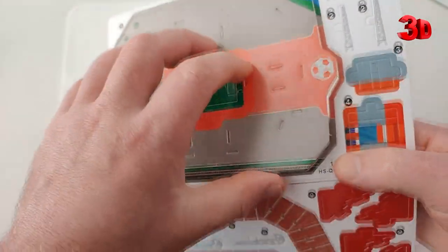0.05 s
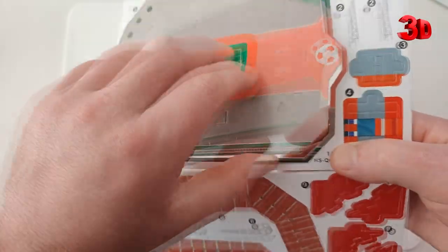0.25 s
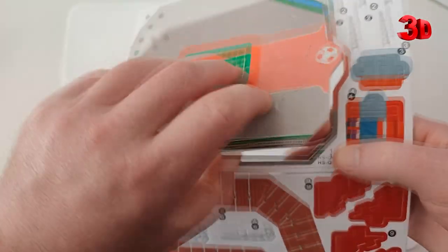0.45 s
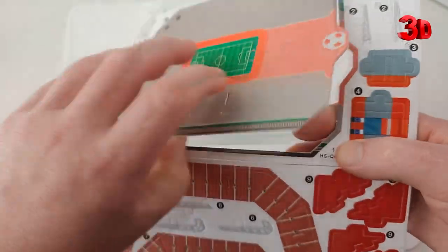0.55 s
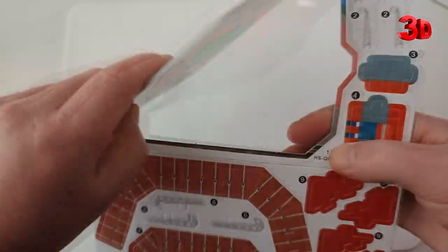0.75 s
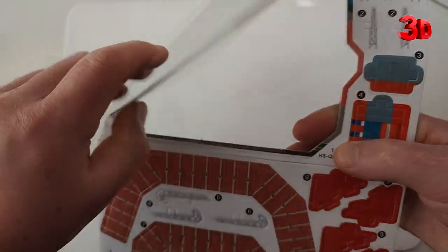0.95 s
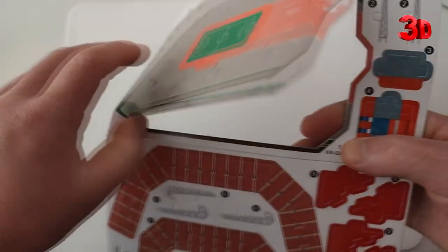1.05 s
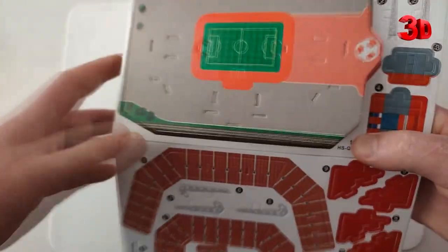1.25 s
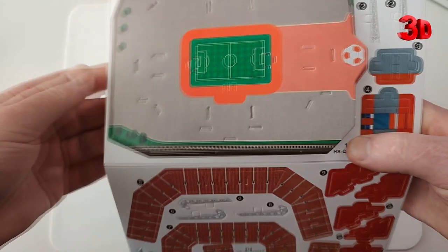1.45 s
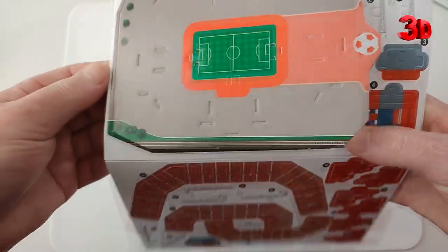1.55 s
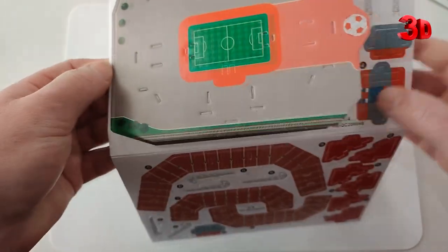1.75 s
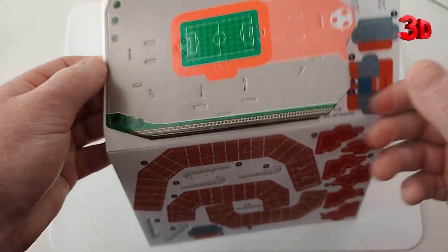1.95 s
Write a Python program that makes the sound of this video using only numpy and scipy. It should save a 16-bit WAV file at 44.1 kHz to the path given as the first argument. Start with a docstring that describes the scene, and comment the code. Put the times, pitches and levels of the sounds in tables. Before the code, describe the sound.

A stiff card panel snaps out of its sheet at about 0.2 seconds with one loud, cracking knock, the table ringing faintly beneath. A hand bumps the stack dully near 0.4 seconds. The card ticks and scrapes briefly from 0.6 to 0.8 seconds. Quieter ticks, slides and soft puffs of air follow around 1.2, 1.5 and 1.9 seconds, all heard close up in a small room.

```python
"""A panel snaps out of a stiff die-cut puzzle sheet with one loud knock, close to a stereo microphone pair.
Its tabs crack, it bends for a few cycles, and the table rings faintly underneath, in a small room.
Around the knock, hands leaf through the sheets: a hand bumps the stack, the panel scrapes past its frame,
card edges tick and flap as it falls back, and the moving sheets push soft puffs of air."""
import sys
import numpy as np
from scipy import signal
from scipy.fft import rfft, irfft
from scipy.io import wavfile
from scipy.ndimage import uniform_filter1d, map_coordinates

SR = 44100
rng = np.random.default_rng(int(sys.argv[2]) if len(sys.argv) > 2 else 0)


def put_to_file(sound):
    """Save the sound as 16-bit audio at rate SR, in the file named by the first command-line argument."""
    columns = np.atleast_2d(sound).T  # one column per channel
    safe = np.clip(columns, -1, 1)
    whole_steps = np.round(safe * 32767)
    wavfile.write(sys.argv[1], SR, whole_steps.astype(np.int16))


N = 88200
SIZE = 32768  # samples in one event
T, HZ = np.arange(SIZE) / SR, np.fft.rfftfreq(SIZE, 1 / SR)


def amp(db):
    """Decibels to gain."""
    return 10 ** (np.asarray(db) / 20)


def along(points, hz):
    """(Hz, value) points read on a log frequency axis."""
    point_hz, values = np.transpose(points)
    return np.interp(np.log(hz + 1), np.log(point_hz), values)


def colour(points, hz=HZ):
    """The gain of a spectrum, scaled to unit power."""
    gain = amp(along(points, hz))
    return gain / np.sqrt(np.mean(gain ** 2))


def causal(x, gain):
    """Minimum-phase filter: nothing sounds ahead of the hit."""
    cepstrum = irfft(np.log(np.maximum(gain, 1e-6)))
    fold = np.r_[1, np.full(SIZE // 2 - 1, 2), np.zeros(SIZE // 2)]
    return irfft(rfft(x) * np.exp(rfft(cepstrum * fold)))


def struck(attack_s, t60):
    """A quick rise, then a fall of 60 dB in t60 seconds."""
    return (1 - np.exp(-T / attack_s)) * np.exp(-np.log(1000) * T / t60)


def sides(pan_db):
    """Gains at the two microphones, the right pan_db above the left."""
    return amp(np.array([[-pan_db], [pan_db]]) / 2)


def add(out, start, x):
    """Mix x in at start seconds."""
    i = max(0, round(start * SR))
    out[:, i:i + SIZE] += x[:, :N - i]


# The small room's decay. Each row: frequency in Hz, t60 in seconds.
ROOM_DECAY = [(100, 0.76), (500, .42), (2000, 0.34), (7000, 0.29), (14000, .28)]
# The colour of its answer. Each row: frequency in Hz, gain in dB.
ROOM_COLOUR = [(60, -9.5), (130, -4), (205, -9), (320, -0.5), (480, -1), (650, 1.5), (900, -1.5), (2000, 0),
               (6000, -3.5), (13000, -1)]


def room(x, wet_db, build_s=.0038):
    """The close sound plus the room's answer, each frequency dying at its own speed."""
    hz, t, noise = signal.stft(rng.standard_normal((2, SIZE)), SR, nperseg=256)
    t60 = along(ROOM_DECAY, hz)[:, None]
    fade = np.exp(-np.log(1000) * t / t60) * np.sqrt(2 * np.log(1000) / (t60 * SR))
    tint = amp(along(ROOM_COLOUR, hz))[:, None]
    tail = signal.istft(noise * fade * tint, SR, nperseg=256)[1][:, :SIZE]
    tail *= 1 - np.exp(-(T / build_s) ** 2)
    return x + amp(wet_db) * signal.fftconvolve(x, tail, axes=1)[:, :SIZE]


# The background's colour. Each row: frequency in Hz, relative level in dB.
HUSH_COLOUR = [(20, 8.5), (60, 5.5), (130, 6.5), (220, -3.5), (400, -1), (850, -3), (2000, -6.5),
               (3500, -14.5), (7500, -11), (9500, -15.5), (11500, -6.5), (14200, -9)]
# Its course. Each row: time in seconds, level in dB.
HUSH_LEVEL = [(0, -61), (.9, -57), (1.05, -63), (1.4, -65), (1.7, -70.5), (1.879, -74.5), (2, -71.5)]


def hush(alike=.96):
    """A faint background, nearly the same at both microphones, sinks as the hands come to rest."""
    spectrum = colour(HUSH_COLOUR, np.fft.rfftfreq(N, 1 / SR))
    shared, left, right = irfft(rfft(rng.standard_normal((3, N))) * spectrum, N)
    level_db = np.interp(np.arange(N) / SR, *np.transpose(HUSH_LEVEL))
    return (np.sqrt(alike) * shared + np.sqrt(1 - alike) * np.array([left, right])) * amp(level_db)


# Soft bumps of hand and sheet, and the puffs of air they push at the microphones.
# Each row: start in seconds, level in dB, pitch in Hz, t60 in seconds.
SHEET_BUMPS = [(0.001, -47.5, 20, .15), (0.08, -45.5, 28, .1), (0.065, -45, 115, 0.14),
               (0.283, -24, 97, 0.038), (0.413, -29, 77, 0.043), (0.4268, -14.5, 92, 0.055),
               (0.428, -18.5, 247, 0.024), (0.583, -38, 82, 0.077), (0.728, -30.5, 119, .06),
               (0.702, -39, 24, 0.58), (0.832, -40.5, 35, 0.099), (1.137, -46, 33.5, 0.15),
               (1.142, -45, 103, 0.11), (1.196, -38, 140, 0.1), (1.212, -33, 19, 0.29),
               (1.51, -40, 82, 0.071), (1.533, -38, 22.9, 0.21), (1.536, -43.5, 150, 0.083),
               (1.921, -40, 192, 0.12), (1.925, -33.5, 15.6, 0.3), (1.939, -38.5, 96, 0.14),
               (1.987, -28.5, 98, 0.063)]


def bumps():
    """The whole sheet swings a few times, slowly."""
    out = np.zeros((2, N))
    for start, db, hz, t60 in SHEET_BUMPS:
        swing = -np.sin(2 * np.pi * hz * T) * struck(.0026, t60)
        add(out, start, amp(db) * room(swing * sides(pan_db=-1), wet_db=-14.5))
    return out


def fibres(rough_db, grain_hz, left_lead_s=.0001, apart_hz=11100):
    """Gritty noise of fibres catching: alike at both microphones in the bass, less so in the treble."""
    spread = np.pi / 4 * HZ / np.hypot(HZ, apart_hz)
    mid, side = rfft(rng.standard_normal((2, SIZE))) * [np.cos(spread), np.sin(spread)]
    lead = np.exp(1j * np.pi * HZ * left_lead_s)
    grit = amp(rough_db * np.interp(T * grain_hz, np.arange(SIZE), rng.standard_normal(SIZE)))
    return irfft([(mid + side) * lead, (mid - side) / lead]) * grit / np.sqrt(np.mean(grit ** 2))


# Stiff card heard from close by. Each row: frequency in Hz, relative level in dB.
CARD_COLOUR = [(60, -6), (140, 4.5), (210, 0), (320, 6), (450, 2), (620, 8), (900, 5), (1250, 1), (1750, 5),
               (2400, 1), (3200, -1), (4600, -3), (6200, -2), (7700, 0), (9200, -12), (11200, 1.5),
               (12400, 0.5), (14200, -13)]


def card(x, body_db, top_db, resonance=1, body_hz=2200, top_hz=9500, reflection=.45):
    """The card's colour, with more or less body and top, combed by its reflection off the table."""
    shelves_db = body_db / (1 + (HZ / body_hz) ** 2) + top_db / (1 + (top_hz / (HZ + 1)) ** 6)
    delay_s = rng.uniform(.0003947, .0028)
    comb = np.abs(1 + reflection * np.exp(-2j * np.pi * HZ * delay_s)) / np.hypot(1, reflection)
    return causal(x, colour(CARD_COLOUR) * amp(shelves_db) * resonance * comb)


# Card sliding on card or skin, just right of centre. Each row: time of the peak, rise time
# and time to fall 20 dB, all in seconds, then level, body and top in dB.
CARD_SLIDES = [(0.115, 0.046, 0.069, -55, 4, -3), (0.411, .015, 0.038, -45.5, 11, -1.5),
               (0.454, 0.037, 0.17, -47.5, 2.5, 0.5), (0.592, .035, 0.057, -41.5, -1, 0.5),
               (0.691, 0.013, 0.049, -25, -13, -17), (0.83, .03, 0.19, -56.5, -10, -4),
               (1.164, 0.028, 0.032, -51.5, 2, 6), (1.214, 0.017, 0.024, -45, -3.5, 2.5),
               (1.548, 0.033, 0.056, -53.5, -4, 7.5), (1.99, .04, 0.059, -61, 5, -4)]


def slides():
    """Each stroke swells, then dies away, grainy with tiny slips."""
    out = np.zeros((2, N))
    for peak, rise, fall, db, body_db, top_db in CARD_SLIDES:
        stroke = np.minimum(T / rise, 1) * amp(-20 * np.maximum(T - rise, 0) / fall)
        rub = card(fibres(rough_db=4, grain_hz=902) * stroke, body_db, top_db)
        add(out, peak - rise, amp(db) * room(rub * sides(pan_db=1.5), wet_db=-4.5))
    return out


# Card edges catching and tapping near the microphones. Each row: start in seconds, level in dB,
# body in dB, top in dB, t60 in seconds, right over left in dB, pitch of the free span in Hz.
EDGE_TICKS = [(0.001, -52, 4.5, -1.5, 0.076, 4.5, 1520), (0.0617, -39.5, -4.5, 7, 0.029, 2, 1520),
              (0.083, -49, -8, 0, .02, 8, 1600), (0.1635, -38.5, -1.5, 7.5, 0.053, 2, 744),
              (0.177, -46.5, 15.5, 3, 0.024, 3, 1460), (0.2034, -17.5, -3, 1, 0.042, -3, 1380),
              (0.230, -20, -9, 5, 0.011, -8, 730), (0.2497, -12.5, -11, -1.5, 0.015, 3, 1340),
              (0.293, -35.5, 10, -15, 0.046, 3.5, 660), (0.4275, -33.5, 7.5, -4, 0.017, 4, 1050),
              (0.560, -33.5, -4.5, 5.5, 0.031, 1, 1700), (0.566, -25, -11, 4.5, 0.011, 6.5, 2240),
              (0.5977, -37, 13.5, -2, 0.021, 1, 935), (0.646, -32, -22, 2, 0.034, 5, 2010),
              (0.653, -26.5, -8, 14, 0.017, 5, 1610), (0.673, -37.5, -8, 7, 0.022, 10, 1860),
              (0.6845, -31, -35, -4, .02, 7, 1900), (0.6893, -24, -3, -1, 0.019, 4.5, 1694),
              (0.700, -23.5, -13.5, 2.5, 0.033, 8, 2230), (0.808, -33.5, -1, -6.5, 0.022, 4, 1590),
              (1.1416, -47, -9, 2.5, .05, 1.5, 352.3), (1.166, -51.5, 0, 0, .04, -8.5, 1322),
              (1.193, -27.5, 1.5, 7, 0.024, 2.5, 965), (1.1977, -30.5, -1.5, 3.5, 0.022, 0.5, 625),
              (1.211, -27.5, -10, 7, 0.016, 5, 781), (1.507, -33.5, -0.5, 6, 0.021, 0, 795),
              (1.533, -33, -0.5, 4.5, 0.022, 5, 1068), (1.575, -50.5, -3.5, -1.5, 0.024, -0.5, 937.6),
              (1.590, -52.5, 5, -1.5, 0.048, 0.5, 787), (1.608, -56, 2.5, 9, 0.0094, -4.5, 1998),
              (1.918, -40, -3, 12.5, 0.058, 3, 525.5), (1.921, -36.5, 1, 6, 0.022, 3, 1698)]


def ticks(span_db=7.5, span_sharpness=12):
    """Each edge contact is a brief gritty burst that rings the free span of card."""
    out = np.zeros((2, N))
    for start, db, body_db, top_db, t60, pan_db, hz in EDGE_TICKS:
        burst = fibres(rough_db=1.5, grain_hz=1510) * struck(.00048, t60)
        span = amp(span_db / (1 + (span_sharpness * (HZ / hz - 1)) ** 2))
        tick = card(burst, body_db, top_db, span)
        add(out, start, amp(db) * room(tick * sides(pan_db), wet_db=-2))
    return out


# The table under the knock. Each row: frequency in Hz, level in dB, t60 in seconds.
TABLE_MODES = [(404, -38.5, 0.4), (579, -32.5, .28), (639, -32, 0.41), (728, -31, 0.34),
               (1028, -35.5, 0.34), (1120, -28, 0.15), (1382, -36, .22), (1512, -33.5, .28),
               (1590, -43, 0.1), (1930, -35, 0.24)]


def table_ring(blur_rad=.9, blur_hz=90):
    """The table rings on faintly, each mode blurred by a wandering phase."""
    ring = np.zeros((2, SIZE))
    for hz, db, t60 in TABLE_MODES:
        wander = blur_rad * map_coordinates(rng.standard_normal(SIZE // 64), [T * blur_hz])
        mic_phases = rng.uniform(0, 2 * np.pi) + rng.normal(0, .4, (2, 1))
        ring += amp(db) * np.sin(2 * np.pi * hz * T + wander + mic_phases) * struck(.003, t60)
    return ring


# The panel's bending modes, close up.
# Each row: frequency in Hz, level in dB, t60 in seconds, right over left in dB.
PANEL_MODES = [(120, -23.5, 0.072, -0.5), (295, -12.5, .03, -4), (416, -6.5, 0.022, -3.5),
               (592, -2.5, 0.02685, -1.5), (966, -6, 0.02, 3.5), (1364, -6, 0.02, -1.5),
               (1534, -10.5, .022, -1.5), (2407, -6.5, .02, -1.5)]


def panel_bend(right_lead_s=.0001, cut_hz=75):
    """The freed panel flexes for a few heavily damped cycles, too small to radiate deep bass."""
    mic_time = T + np.array([[-right_lead_s], [right_lead_s]]) / 2
    bend = sum(amp(db) * sides(pan_db) * np.sin(2 * np.pi * hz * mic_time) * struck(.0005, t60)
               for hz, db, t60, pan_db in PANEL_MODES)
    return signal.sosfilt(signal.butter(2, cut_hz, "high", fs=SR, output="sos"), bend)


# The tabs that give way. Each row: start in seconds, level in dB, t60 in seconds.
TAB_CRACKS = [(0.2056, -8.5, 0.013), (0.2086, -14.5, 0.016)]
# Their colour at close range. Each row: frequency in Hz, relative level in dB.
TAB_COLOUR = [(100, -6), (700, 0.5), (1400, 2), (2000, -2), (2500, 4), (3100, -3.5), (5200, -0.5),
              (7500, -3.5), (9000, -6), (10500, 0), (12200, 5), (14200, -4.5)]


def knock(snap_s=.2053):
    """The panel snaps free: it bends, the table rings, and the tabs crack in bursts of fibre noise."""
    out = np.zeros((2, N))
    add(out, snap_s, room(panel_bend(), wet_db=-9) + table_ring())
    for start, db, t60 in TAB_CRACKS:
        burst = fibres(rough_db=1.2, grain_hz=2000, left_lead_s=-.00005) * struck(.0003, t60)
        crack = causal(burst, colour(TAB_COLOUR))
        add(out, start, amp(db) * room(crack * sides(pan_db=1), wet_db=-1.5))
    return out


def scene():
    """The knock and the handling over the background, as they reach the microphones."""
    return knock() + ticks() + slides() + bumps() + hush()


def record(dry, gate_db=-54.5, duck_db=-3.67, window_s=.015, ceiling=.9, top_hz=14300):
    """The recorder turns down quiet moments, rounds off high peaks and cuts the highest treble."""
    above_bass = signal.sosfilt(signal.butter(2, 300, "high", fs=SR, output="sos"), dry)
    power = uniform_filter1d(np.mean(above_bass ** 2, axis=0), int(window_s * SR))
    level_db = 10 * np.log10(np.abs(power) + 1e-12)
    gated = dry * amp(np.where(level_db < gate_db, duck_db, 0))
    rounded = gated / (1 + np.abs(gated / ceiling) ** 6) ** (1 / 6)
    return signal.sosfilt(signal.cheby1(12, .2, top_hz, fs=SR, output="sos"), rounded)


dry = scene()
out = record(dry)
put_to_file(out)
```